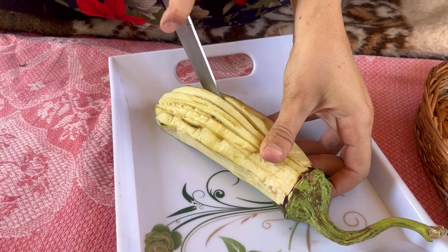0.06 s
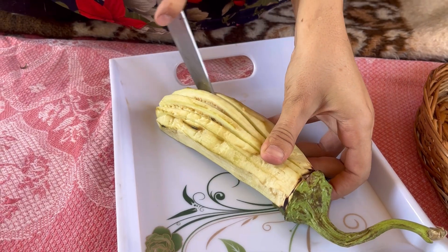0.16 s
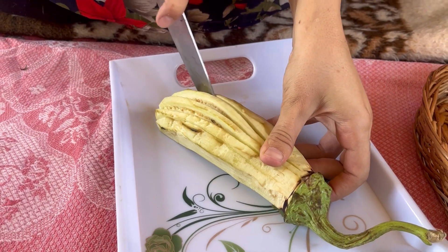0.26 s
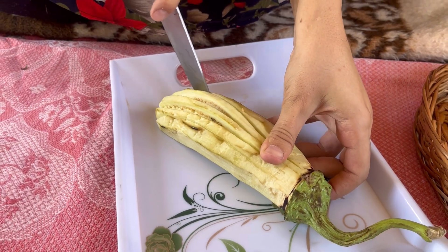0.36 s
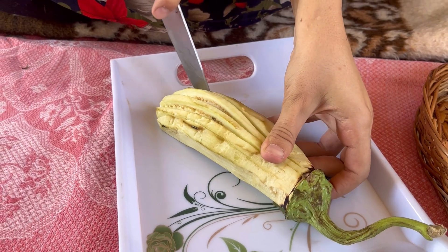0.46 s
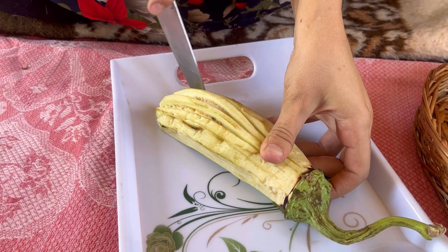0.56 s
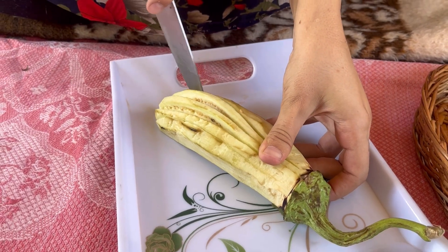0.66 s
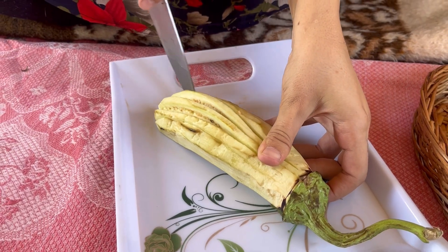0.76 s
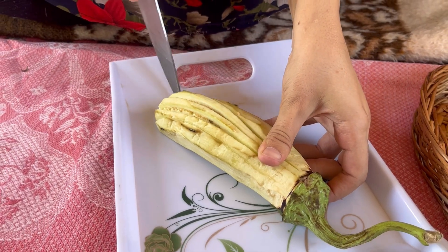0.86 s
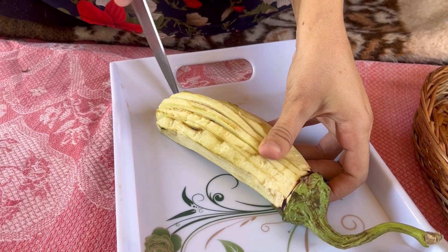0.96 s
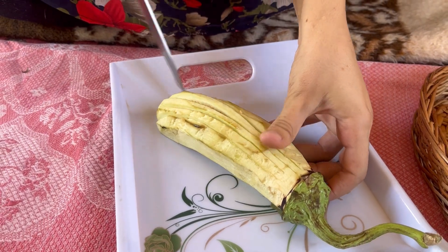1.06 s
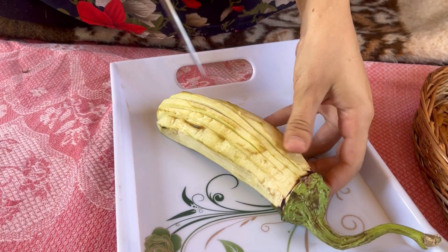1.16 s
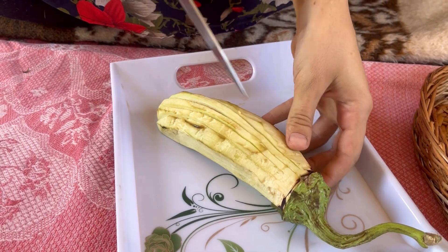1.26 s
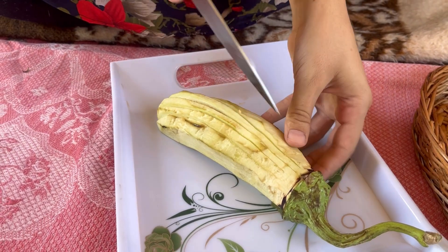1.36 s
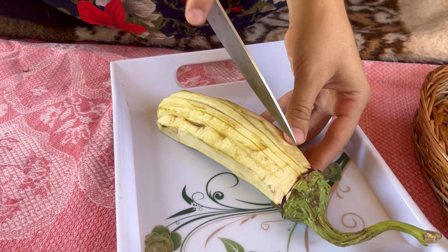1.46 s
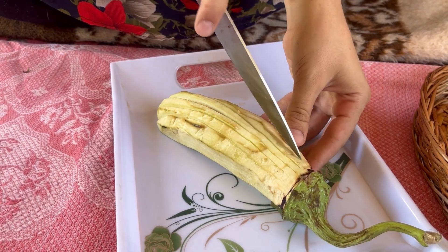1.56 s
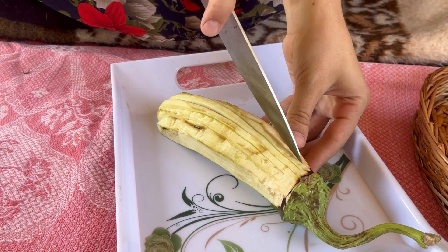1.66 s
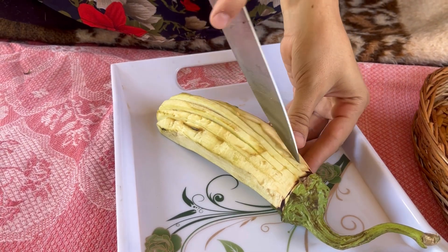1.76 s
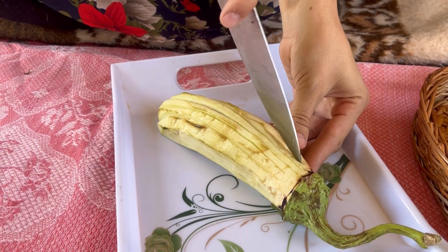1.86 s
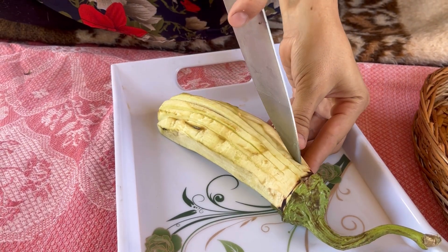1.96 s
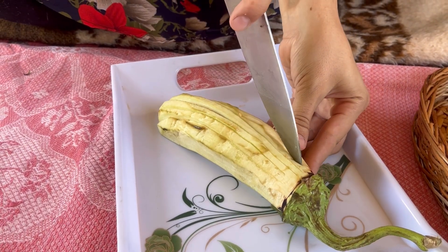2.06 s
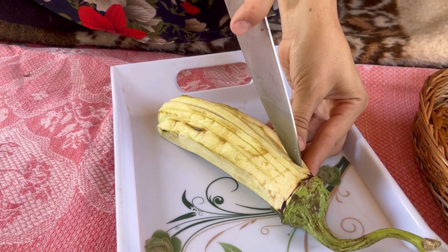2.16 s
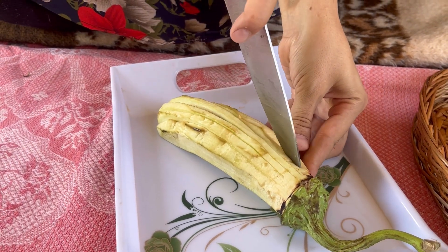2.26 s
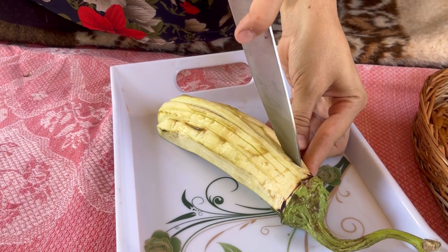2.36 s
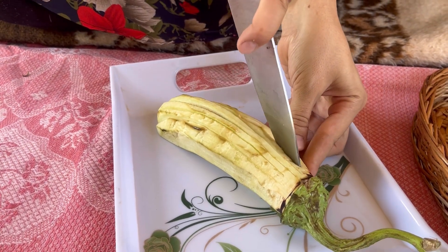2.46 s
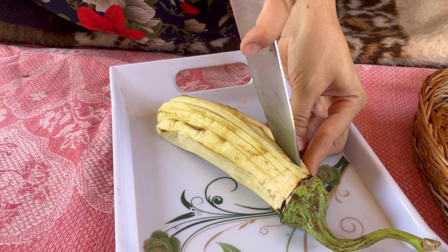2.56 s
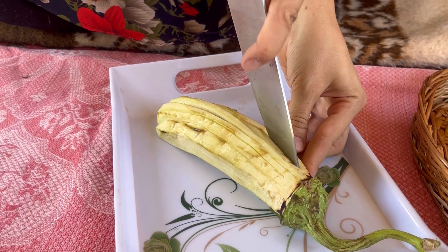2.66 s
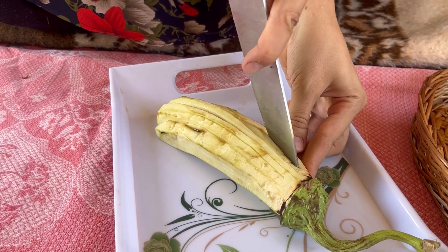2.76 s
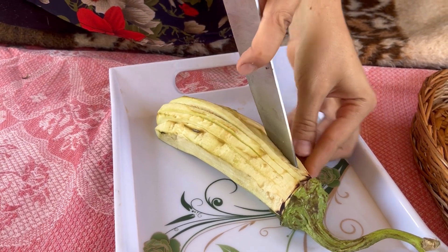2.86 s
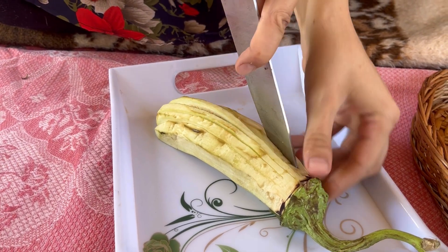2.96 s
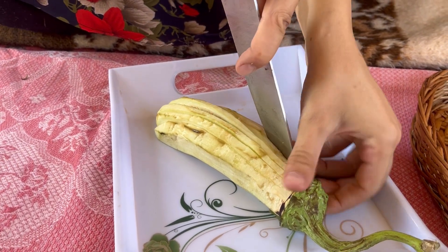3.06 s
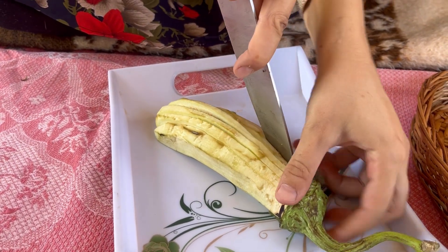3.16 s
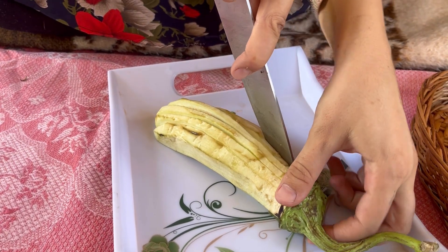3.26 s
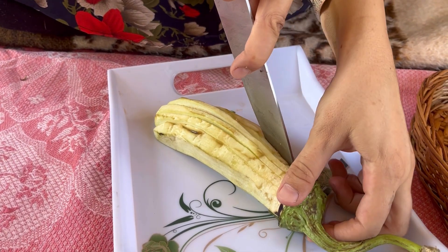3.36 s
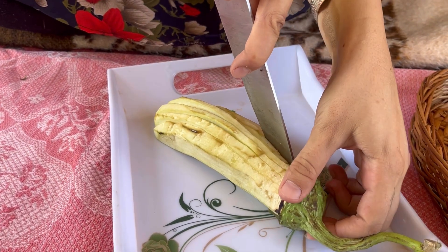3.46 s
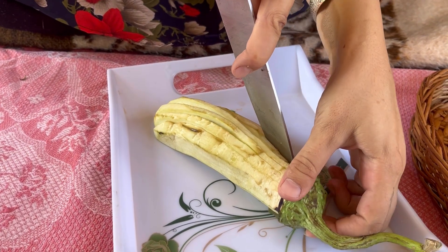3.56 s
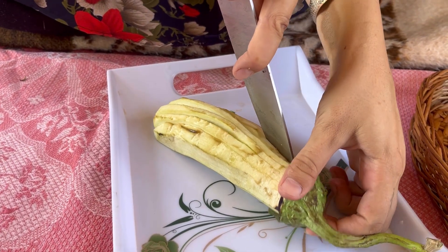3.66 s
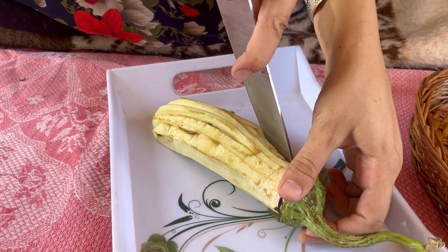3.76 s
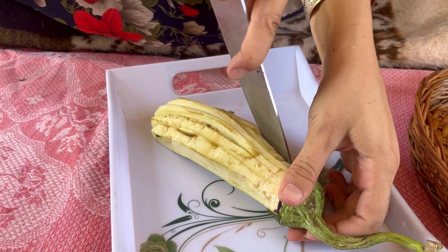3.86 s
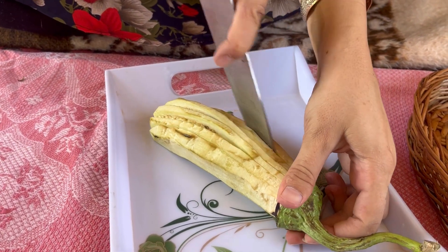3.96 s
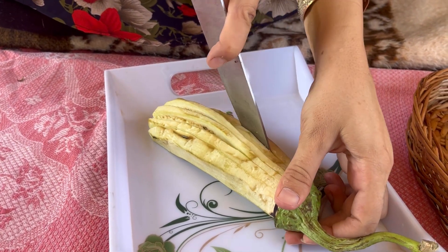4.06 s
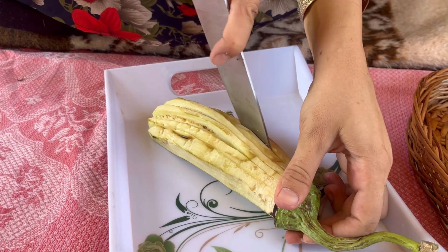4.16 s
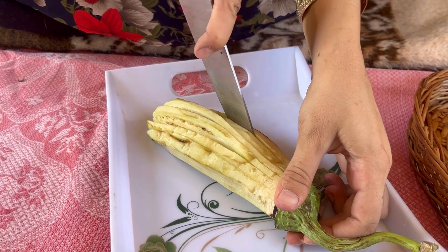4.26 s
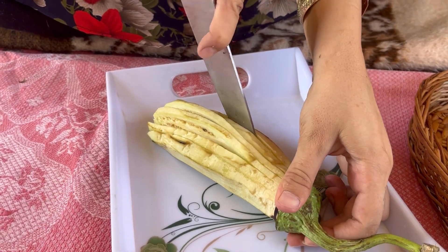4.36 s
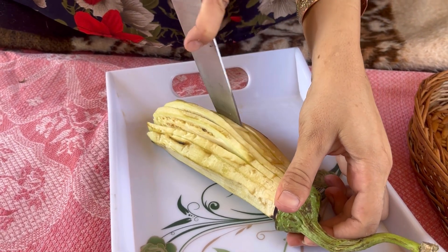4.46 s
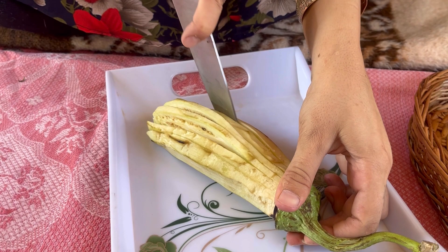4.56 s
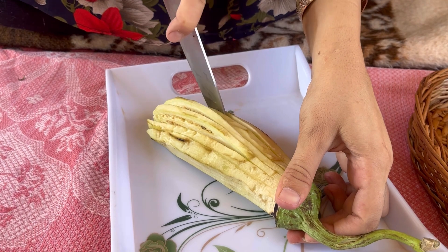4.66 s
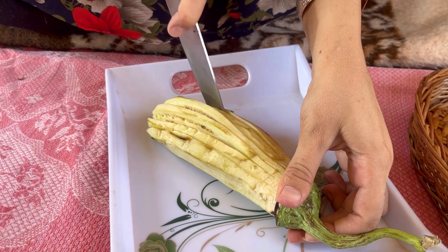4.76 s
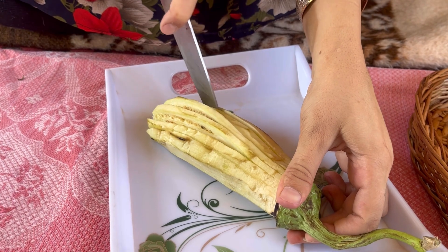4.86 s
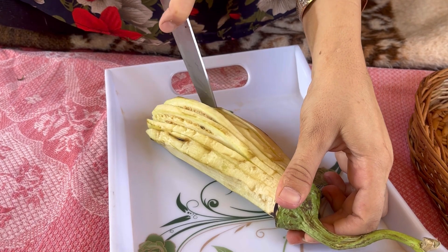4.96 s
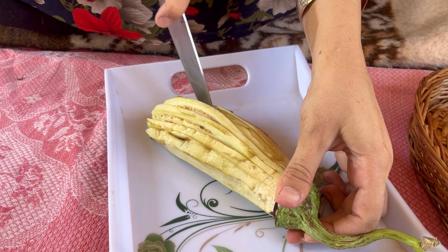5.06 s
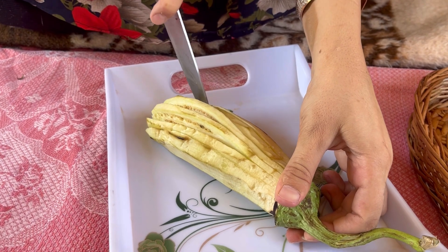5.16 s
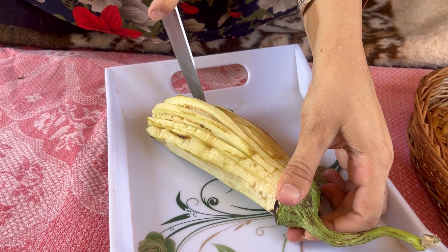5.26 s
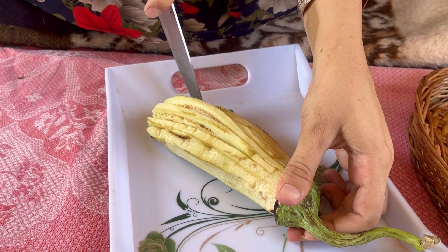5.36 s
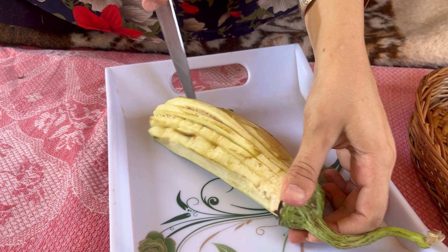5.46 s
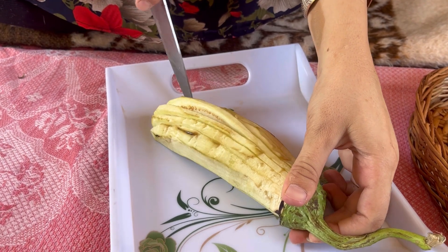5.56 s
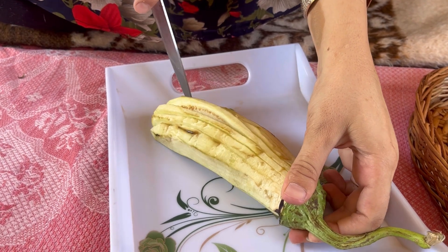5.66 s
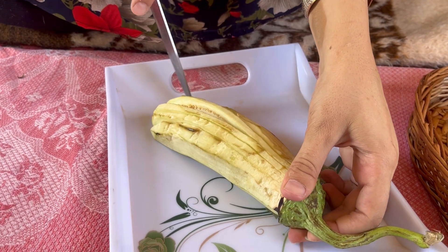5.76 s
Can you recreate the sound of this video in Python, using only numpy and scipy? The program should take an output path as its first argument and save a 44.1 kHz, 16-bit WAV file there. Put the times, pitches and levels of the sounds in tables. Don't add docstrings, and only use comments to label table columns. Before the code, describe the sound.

A close stereo phone pickup in a soft, quiet room. Cutting is already underway: short gritty rasps and moist crunches shake a light plastic tray. A strong hollow knock lands at 0.12 s, a duller one at 0.33 s, and a harsh, bright scrape with a knock at 0.8 s; a small stroke follows near 1 s. Then mostly faint hum, which sinks back. From about 1.8 s barely audible rubs grow slightly, until the hardest, sharpest knock at 2.68 s. Light ticks and brushes follow around 3.0-3.8 s. From 3.9 s firm strokes return in irregular succession, with clear clicking knocks at 4.18 and 4.38 s, softer crunching through 4.5-5.1 s, and another light knock at 5.2 s. A final bright rasp and steel tick at 5.46 s makes the blade sing briefly, leaving only room hum and faint low traffic rumble.

```python
import sys
import numpy as np
from scipy import signal
from scipy.fft import rfft, irfft, next_fast_len
from scipy.io import wavfile
from scipy.ndimage import uniform_filter1d

SR = 44100
rng = np.random.default_rng(int(sys.argv[2]) if len(sys.argv) > 2 else 0)


def unload_audio(sound):
    columns = np.transpose(np.atleast_2d(sound))
    steps = np.round(np.clip(columns, -1, 1) * 32767)
    wavfile.write(sys.argv[1], SR, steps.astype(np.int16))


def magnitude_from_level(level_db):
    exponent = np.asarray(level_db, float) / 20
    return 10 ** exponent


N = 255545


def evened(x):
    return x / np.sqrt(np.mean(x ** 2) + 1e-20)


def read(points, hz):
    f, value = np.transpose(points)
    return np.interp(np.log(hz + 1), np.log(f + 1), value)


def shape(x, gain):
    size = next_fast_len(x.shape[-1])
    spectrum = rfft(x, size) * gain(np.fft.rfftfreq(size, 1 / SR))
    return irfft(spectrum, size)[..., :x.shape[-1]]


def colour(x, spectrum):
    level = np.sqrt(np.mean(magnitude_from_level(2 * read(spectrum, np.linspace(0, SR / 2, num=4000)))))
    return shape(x, lambda hz: magnitude_from_level(read(spectrum, hz)) / level)


LOUD_S = [
    -.05,
    .123,
    .5,
    .8,
    2.675,
    3.972,
    4.38,
    4.84,
    5.21,
    5.46,
]


def suppressor(t):
    hold_s, close_s = 0.58, 0.12
    loud = np.array(LOUD_S)[:, None]
    return ((t >= loud) * np.clip(1 - (t - loud - hold_s) / close_s, 0, 1)).max(0)


def jolts(t):
    jolt_db, t60_s = -40, 0.51
    s, peak_db = np.transpose(KNOCKS)[:2, :, None]
    return ((t >= s) * magnitude_from_level(peak_db + jolt_db - 60 * np.maximum(t - s, 0) / t60_s)).sum(0)


# (frequency [Hz], density [dB per Hz])
HUM_SHUT = [(150, -9), (300, -5), (700, -7), (1100, -0.5), (1400, 4.5), (2300, -5.5), (3200, -9),
            (6000, -12.5), (7000, -18), (12000, -22.5), (14500, -28), (15700, -54), (16000, -58)]
# (frequency [Hz], density [dB per Hz])
HUM_OPEN = [(150, -16.5), (300, -0.5), (700, -7), (1100, 0.5), (1400, 3), (2300, -5.5), (3200, -12),
            (6000, -15), (7000, -20.5), (12000, -26.5), (14500, -31), (15700, -49), (16000, -71)]
# (frequency [Hz], width [Hz], level over hum [dB], more when let through [dB])
HUM_PEAKS = [(525, 28, 16, 6.5), (1367.7, 45, 7.5, 4), (2577, 43, 11, -1.5)]
# (frequency [Hz], density [dB per Hz])
RUMBLE = [(20, -48), (45, -61), (65, 0), (85, -0.5), (120, -5), (170, -11), (300, -66)]
# (time [s], level [dB])
TRAFFIC = [
    (0.0, -70),
    (0.42, -73),
    (0.77, -69),
    (1.66, -88),
    (2.8, -76),
    (3.5, -85.5),
    (4.35, -72),
    (4.82, -78.5),
    (5.66, -65.5),
    (5.79, -74),
]
# (frequency [Hz], likeness [0-1])
HUM_SAME = [(100, 0.98), (350, 0.76), (800, 0.08), (1400, 0.31), (2000, 0.14), (2500, 0.53), (3200, 0.25),
            (5000, 0.67), (7000, 0.099), (8500, 0.077), (10000, 1), (11300, 0.54), (13500, 0.84)]


def room():
    shut_db, open_db = -62, -57.5
    shut_blend, open_blend = -0.51, 0.89
    traffic_db, lump_db = 1.5, -4
    frames, hz = N // 512 + 5, np.fft.rfftfreq(2048, 1 / SR)
    a, b, c, d, patches = rng.standard_normal((frames, 1025, 5)).T
    patches = evened(uniform_filter1d(uniform_filter1d(patches, 20, 0), 5, 1))
    t = np.arange(frames) * 512 / SR
    through = suppressor(t)
    lumps = evened(uniform_filter1d(rng.standard_normal(frames), size=8))
    hum_db = shut_db + (open_db - shut_db) * through
    blend = shut_blend + (open_blend - shut_blend) * through
    rumble = magnitude_from_level(traffic_db + np.interp(t, *np.transpose(TRAFFIC)) + lump_db * lumps) + jolts(t)
    hum = read(HUM_SHUT, hz)[:, None] * (1 - blend) + read(HUM_OPEN, hz)[:, None] * blend
    for f, width, db, more_db in HUM_PEAKS:
        hum = hum + (db + more_db * through) / (1 + (2 * (hz[:, None] - f) / width) ** 2)
    size = magnitude_from_level(hum + hum_db - 37.5 + 0.57 * patches)
    size = size + magnitude_from_level(read(RUMBLE, hz)[:, None] - 19.0) * rumble
    same = np.clip(read(HUM_SAME, hz), 0, 1)[:, None]
    left = a + 1j * b
    right = same * left + np.sqrt(1 - same ** 2) * (c + 1j * d)
    z = size * np.array([left, right])
    return signal.istft(z, nperseg=2048, noverlap=1536)[1][:, :N] * magnitude_from_level(18.5)


def walls(x):
    t = np.arange(int(.3 * SR)) / SR
    tail = rng.standard_normal(len(t)) * magnitude_from_level(-60 * t / 0.27) * (t > .006)
    tail = shape(tail, lambda hz: 1 / (1 + (hz / 2500) ** 2))
    return magnitude_from_level(-23.0) * signal.fftconvolve(x, tail / np.linalg.norm(tail))[:N]


# (frequency [Hz], likeness [0-1])
NEAR_SAME = [(200, 0.99), (800, 0.95), (1500, 0.65), (2100, 0.63), (4300, 0.75), (5500, 0.54), (7800, 0.54),
             (9500, 0.99), (10700, 0.89), (11500, 1), (13800, 0.86)]


def spread(x):
    paths = rfft(rng.standard_normal(500) * magnitude_from_level(-60 * np.arange(500) / SR / 0.033), 4096)
    paths = irfft(paths / np.sqrt(uniform_filter1d(abs(paths) ** 2, size=24)))[:1500]
    other = signal.oaconvolve(x, paths / np.linalg.norm(paths))[:N]
    same = lambda hz: np.clip(read(NEAR_SAME, hz), 0, 1)
    return np.array([x, shape(x, same) + shape(other, lambda hz: np.sqrt(1 - same(hz) ** 2))])


# (frequency [Hz], level [dB], t60 [s])
TRAY = [(205.7, -1.5, 0.13), (270.2, 2.7, 0.11), (333.5, -4, 0.097), (496, 5.5, 0.013), (555, 5.5, 0.023),
        (706, -8.5, 0.057), (760, 2, 0.0033), (1180, 13, 0.019), (1780, -6, 0.085), (1903, -5, 0.13),
        (2030, -62.5, 0.032)]


def tray(mode_db, seconds=0.61):
    hz, db, t60 = np.transpose(TRAY)[:, :, None]
    t = np.maximum(np.arange(int(seconds * SR)) / SR - 0.57 / hz, 0)
    sign = (-1) ** np.arange(len(hz))[:, None]
    modes = sign * magnitude_from_level(db + mode_db[:, None] - 60 * t / t60) * np.sin(2 * np.pi * hz * t)
    return signal.sosfilt(signal.butter(4, 150, "high", fs=SR, output="sos"), modes.sum(0))


LEAD_IN_SAMPLES = 256
# (frequency [Hz], density [dB per Hz])
WAVE = [(70, -75.5), (130, -28), (200, -18.5), (300, -1.5), (480, 7), (800, -3), (1300, -1), (1900, -3.5),
        (2350, -8.5), (2800, -19.5), (5000, -27.5), (9000, -73.5)]


def falling_wave(thud_db, sharp_db):
    rim_s, rim_db = 0.002483, -11
    top_hz = 1800
    hz = np.fft.rfftfreq(4096, 1 / SR)
    db = read(WAVE, hz) + thud_db / (1 + (hz / 340) ** 6) + sharp_db / (1 + (750 / (hz + 1)) ** 4)
    cycles = 1.376 + 0.24 * max(-sharp_db, 0)
    turns = cycles * (np.log(np.minimum(hz + 1, top_hz) / top_hz) - np.minimum(hz / top_hz, 1) + 1)
    rim = 1 + magnitude_from_level(rim_db) * np.exp(-2j * np.pi * hz * rim_s) / (1 + (900 / (hz + 1)) ** 4)
    wave = irfft(magnitude_from_level(db) * rim * np.exp(-2j * np.pi * (turns + hz * LEAD_IN_SAMPLES / SR)))
    return wave / abs(wave).max()


# (time [s], peak [dB], thud over peak [dB], tick over peak [dB], wave sharpness [dB])
KNOCKS = [(0.006, -38, -9, -13.5, -4.5), (0.122, -16, -10, -19, 1.5), (0.331, -37.5, 4, -17.5, -9),
          (0.668, -44, -28, 1.5, -7.5), (0.797, -24.5, -16, -34, -16), (0.972, -51.5, 4, -22, -8.5),
          (2.675, -14, -4, -19.5, 11.5), (2.991, -61, -43, -16, -2), (3.091, -56, -41.5, -33, 0.5),
          (3.973, -35.5, 7, -16, -2.5), (4.017, -43, 4, -34, -3), (4.179, -23.5, -4, -5.5, -2.5),
          (4.227, -35, -4, -14, 9), (4.38, -22.5, -3.5, -8, -4), (4.402, -33.5, -12, -27, -5),
          (4.524, -39, -6, -22, -2.5), (5.172, -38, -24, -13, -4), (5.206, -65, -13, -16, 0),
          (5.46, -31.5, -12.5, -2.5, -4.5)]
# (frequency [Hz], density [dB per Hz])
TICK = [(1500, 4), (3200, -0.5), (5500, -0.5), (7000, -9), (10000, -17), (13000, -22), (15700, -30),
        (16100, -70)]


def knocks():
    ring_db = -24
    out, t = np.zeros(N + SR), np.arange(900) / SR
    lead_in = np.zeros(LEAD_IN_SAMPLES)
    low = .5 * (np.transpose(TRAY)[0] < 320)
    tick_env = np.minimum(t / .0007, 1) * magnitude_from_level(-60 * t / .012) + magnitude_from_level(-16 - 60 * t / .04)
    spots = rng.standard_normal((len(KNOCKS), len(TRAY)))
    bursts = rng.standard_normal((len(KNOCKS), 900))
    for (s, peak_db, thud_db, tick_db, sharp_db), spot, burst in zip(KNOCKS, spots, bursts):
        blow = magnitude_from_level(ring_db) * np.r_[lead_in, tray(2.5 * spot + low * (thud_db + 12))]
        blow[:4096] += falling_wave(thud_db + 12, sharp_db)
        tick = colour(np.r_[lead_in, burst * tick_env], TICK)
        blow[:len(tick)] += magnitude_from_level(tick_db + 5) * tick / abs(tick).max()
        at = round((s + 0.001216) * SR)
        out[at:at + len(blow)] += magnitude_from_level(peak_db + 5.0) * blow
    return out[LEAD_IN_SAMPLES:N + LEAD_IN_SAMPLES]


# (start [s], pitch [Hz], level over rasp [dB])
SLOT = [
    (0, 4870, -13),
    (.42, 2150, -4),
    (.75, 2890, -2.5),
    (0.81, 2140, -0.5),
    (3.85, 1900, -4),
    (4.1, 5400, -7),
    (4.33, 3960, -5.5),
    (4.7, 1740, -5),
    (5.09, 3020, -5.5),
    (5.37, 2480, -2.5),
]


def slot(drive):
    width_hz = 500
    s, pitch, level_db = np.transpose(SLOT)
    cut = np.searchsorted(s[1:], np.arange(N) / SR)
    turn = np.exp(2j * np.pi * np.cumsum(pitch[cut]) / SR)
    r = np.exp(-np.pi * width_hz / SR)
    smooth = signal.lfilter([(1 - r) ** 2], [1, -2 * r, r ** 2], magnitude_from_level(level_db[cut]) * drive / turn)
    return 2 / np.sqrt(1 - r) * (turn * smooth).real


# (frequency [Hz], width [Hz], level tip down [dB], level after regrip [dB])
BLADE = [(2124, 110, -18, -3), (2377, 18, -16, -5), (3130, 47, 4, -2), (4300, 4.3, 11, -9),
         (5010, 5.7, -6, -14), (5510, 130, 9.5, -30), (5440, 310, -14, 0), (6235, 140, 14.5, -6),
         (7300, 220, 4, -9), (7760, 170, 11, -28), (9130, 520, 11, -0.5), (12590, 20, 11.5, -7.5),
         (13700, 70, -36, -53), (14300, 95, 7.5, -21)]


def blade(drive):
    regrip_s, damping_hz = 2.01, 55
    t = np.arange(N) / SR
    hz, width, *grips = np.transpose(BLADE)[:, :, None]
    width = np.maximum(width, damping_hz)
    rings = np.sqrt(width) * np.exp(-np.pi * width * t[:3000]) * np.sin(2 * np.pi * hz * t[:3000])
    sing = 0
    for db, held in zip(grips, [t < regrip_s, t >= regrip_s]):
        modes = (magnitude_from_level(db) * rings).sum(0)
        sing = sing + magnitude_from_level(-0.5) * signal.oaconvolve(drive * held, modes / np.linalg.norm(modes))[:N]
    return sing


def pressure(t, s, rise, fall):
    edge_drop_db, roundness = 29, 1.92
    span = np.maximum(np.where(t < s, rise, fall), .003)
    return magnitude_from_level(-edge_drop_db * np.minimum(abs(t - s) / span, 3) ** roundness)


# (full pressure [s], rise [s], fall [s], rasp [dB], weight on tray [dB])
CUTS = [(0.148, 0.054, 0.033, -47, 2.5), (0.341, 0.055, 0.047, -50, 9), (0.512, 0.062, 0.043, -49, 5.5),
        (0.702, 0.063, 0.046, -47, 12), (0.801, 0.028, 0.045, -31.5, 0), (0.821, 0.036, 0.057, -33, -6.5),
        (0.975, 0.013, 0.028, -58, 9), (3.928, 0.026, 0.063, -45.5, -5), (3.974, 0.015, 0.014, -47, 7),
        (4.22, 0.055, 0.024, -40.5, 4), (4.414, 0.056, 0.037, -48.5, 13), (4.577, 0.062, 0.042, -43, 7.5),
        (4.654, 0.037, 0.035, -63, 13), (4.765, 0.06, 0.069, -56, 15), (4.833, 0.044, 0.064, -53.5, 13),
        (4.94, 0.087, 0.03, -65, 12.5), (5.036, 0.074, 0.057, -50, 9.5), (5.115, 0.04, 0.064, -56, 9),
        (5.212, .07, 0.039, -49.5, 8.5), (5.312, 0.029, 0.039, -46.5, 3.5), (5.447, 0.058, 0.09, -51.5, 11),
        (5.467, .018, 0.049, -32, 1)]
# (full pressure [s], rise [s], fall [s], rasp [dB], weight on tray [dB])
RUBS = [(1.85, 0.16, 0.15, -75.5, 2.5), (2.0, 0.27, 0.25, -76, 10), (2.2, 0.086, 0.15, -71, 5.5),
        (2.41, 0.11, 0.14, -66.5, 10.5), (2.63, 0.12, 0.14, -59, 4.5), (2.694, .02, 0.051, -83, 20),
        (2.994, .02, 0.036, -61, -16), (3.093, 0.019, 0.066, -58.5, -22), (3.189, 0.25, 0.077, -63, 4),
        (3.41, 0.075, .045, -62.5, -20.5), (3.669, 0.046, 0.021, -65, 5.5), (3.80, 0.083, 0.067, -67, -17)]
# (frequency [Hz], density [dB per Hz])
RASP = [(1500, -6.5), (2800, 4.5), (4000, 2), (5300, 2.5), (6800, 0), (9000, 0.5), (11000, -0.5),
        (13000, -2.5), (14700, 0), (15750, -10.5), (16000, -80)]
# (frequency [Hz], density [dB per Hz])
CRUNCH = [(450, -60), (750, 11), (950, -6), (1200, 13), (1600, 2.5), (2100, 8), (2700, -13.5), (3500, -23)]


def strokes():
    t, levels = np.arange(N) / SR, np.zeros((3, N))
    for s, rise, fall, rasp_db, weight_db in CUTS + RUBS:
        near = slice(max(int((s - 2 * rise) * SR), 0), int((s + 2 * fall) * SR))
        crunch_db = 0.5 + weight_db
        layers = magnitude_from_level(rasp_db + np.array([[0], [weight_db], [crunch_db]]))
        levels[:, near] = np.hypot(levels[:, near], layers * pressure(t[near], s, rise, fall))
    rasp_level, tray_level, crunch_level = levels

    clicks = rng.standard_normal(N) * magnitude_from_level(2.1 * np.minimum(rng.exponential(1, N), 3.2))
    clicks = clicks * (rng.random(N) < 3000 / SR)
    slip = magnitude_from_level(1.4 * evened(uniform_filter1d(rng.standard_normal(N), 120)))
    grit = evened(slip * (evened(clicks) + 1.31 * rng.standard_normal(N)))

    rasp = magnitude_from_level(3.0) * colour(grit * rasp_level, RASP)
    crunch = magnitude_from_level(-7.0) * colour(grit * crunch_level, CRUNCH)
    tray_hz = np.transpose(TRAY)[0]
    body = tray(-12 * (tray_hz > 900) - 15 * (tray_hz < 320))
    shake = magnitude_from_level(-6.5) * signal.oaconvolve(grit * tray_level, body / np.linalg.norm(body))[:N]
    hard = np.clip((20 * np.log10(rasp_level + 1e-9) + 66.5) / 24, 0, 1.2)
    sing = blade(grit * rasp_level * hard)
    rasp = rasp * np.sqrt(1 - 0.68 * np.clip(hard, 0, 1))
    return rasp + crunch + shake + sing + slot(grit * rasp_level)


def scene():
    near = knocks() + strokes()
    return spread(near + walls(near)) + room()


def roll_off(x):
    return signal.sosfilt(signal.butter(12, 16200, fs=SR, output="sos"), x)


# (frequency [Hz], left lead [rad])
LEAD = [(0, 0), (1300, .3), (1800, 1.6), (1960, 0), (3800, .6), (5500, .6), (6500, -.8), (8100, -1.5),
        (9500, -3.05), (10700, -3.3), (12000, -5), (13700, -6.2), (16000, -6.3)]
# (frequency [Hz], left minus right [dB])
TILT = [(300, -0.5), (700, -2), (1200, -1), (1800, -1), (3000, 2.5), (5500, 4.5), (7500, 0.5), (9000, 1),
        (15000, 0)]


def record(dry):
    lead = lambda hz: np.exp(.5j * np.interp(hz, *np.transpose(LEAD))) * magnitude_from_level(read(TILT, hz) / 2)
    ports = np.array([shape(dry[0], lead), shape(dry[1], lambda hz: 1 / lead(hz))])
    ports = shape(ports, lambda hz: 1 / np.sqrt(1 + (60 / (hz + 1)) ** 8))
    return roll_off(ports)


dry = scene()
out = record(dry)
unload_audio(out)
```